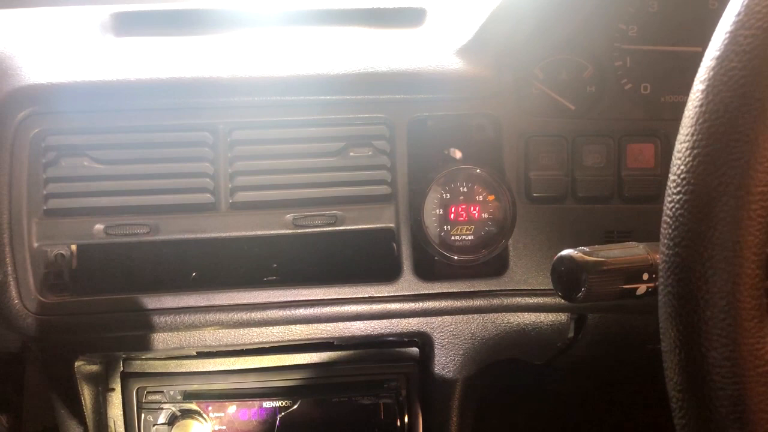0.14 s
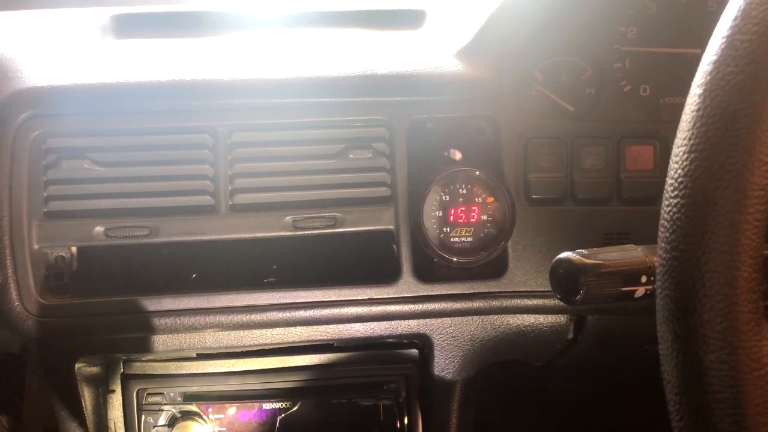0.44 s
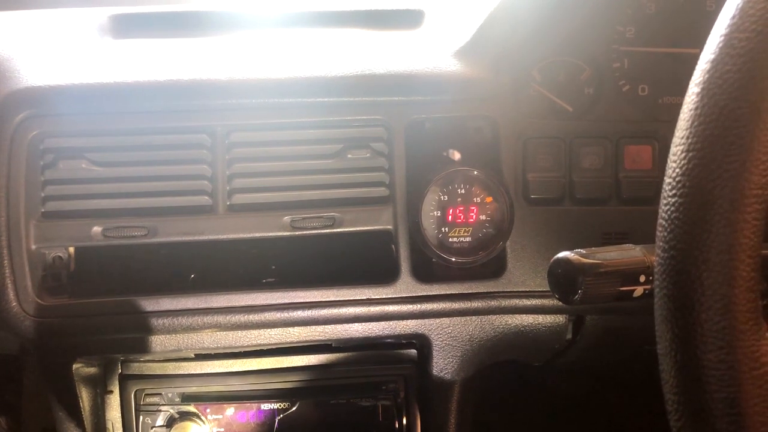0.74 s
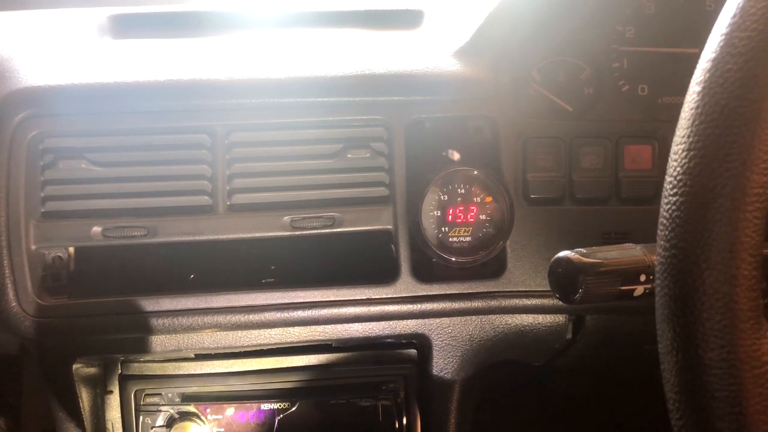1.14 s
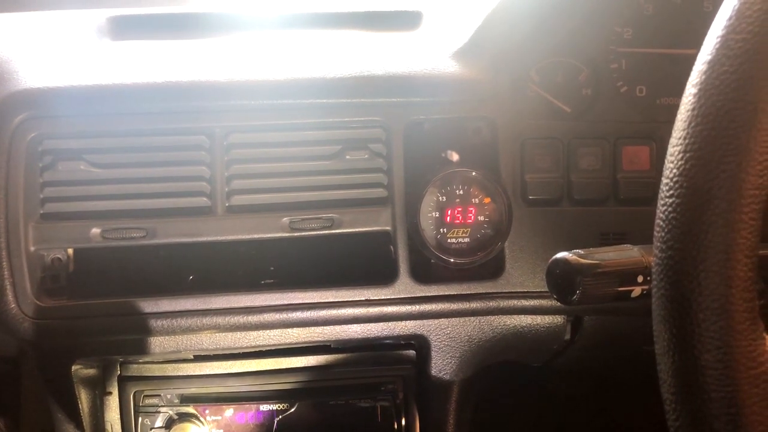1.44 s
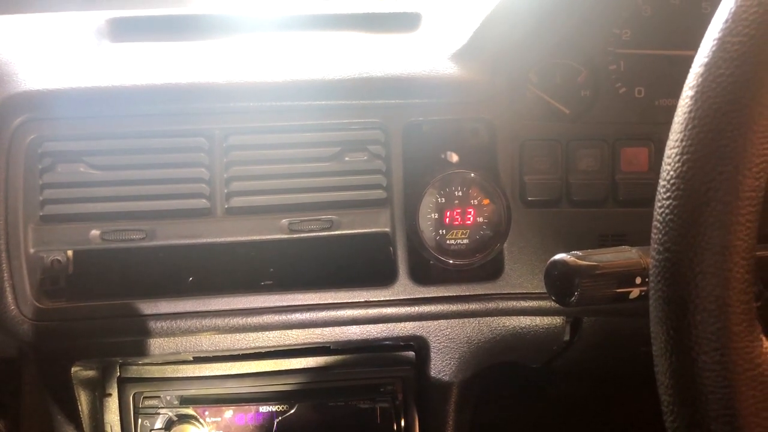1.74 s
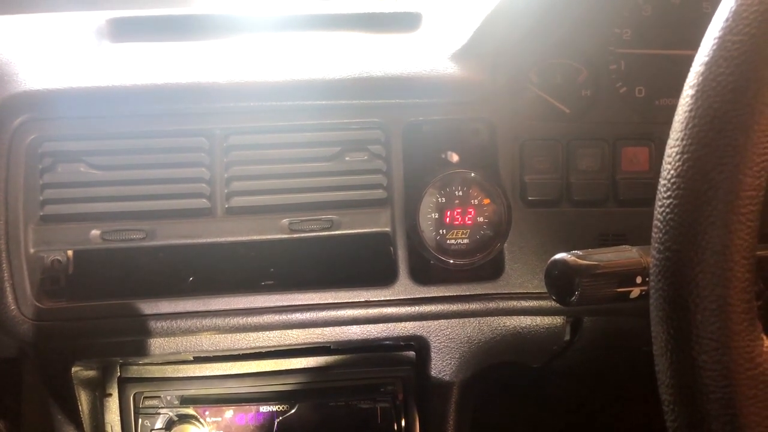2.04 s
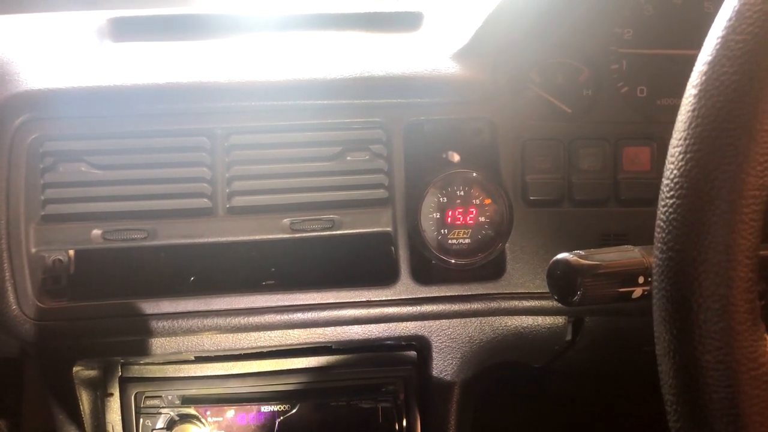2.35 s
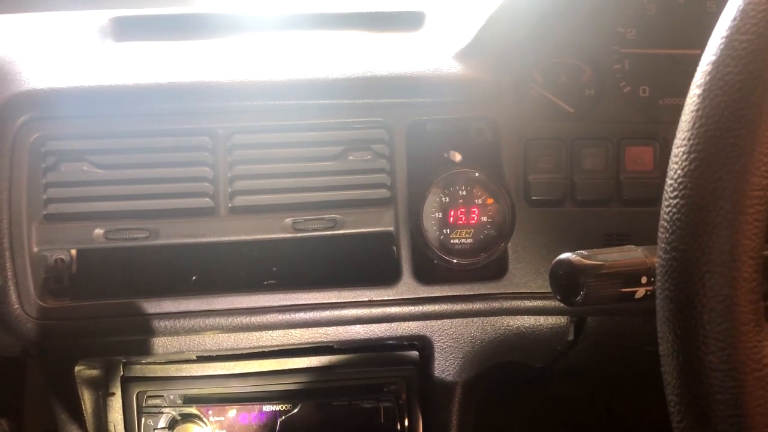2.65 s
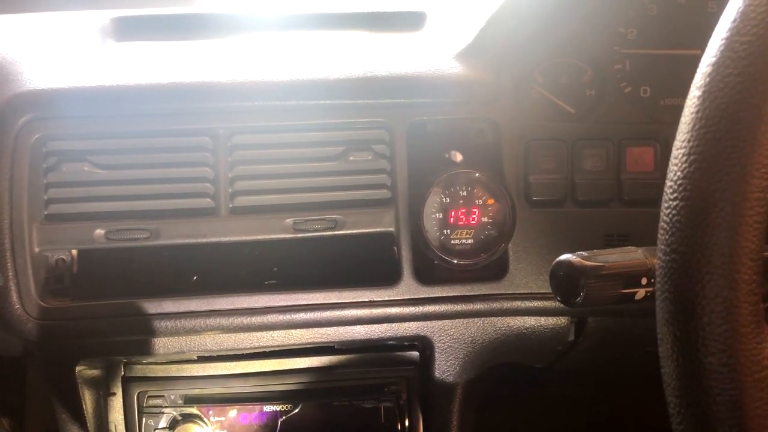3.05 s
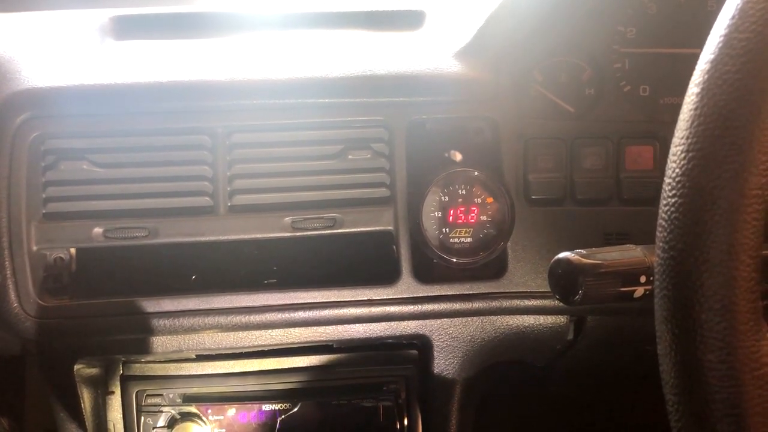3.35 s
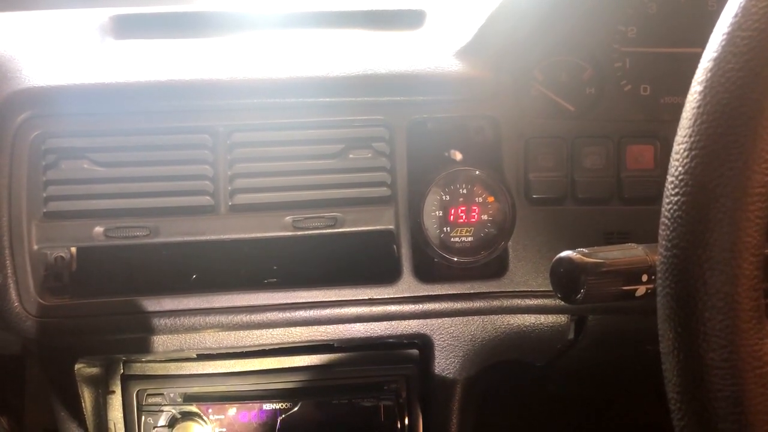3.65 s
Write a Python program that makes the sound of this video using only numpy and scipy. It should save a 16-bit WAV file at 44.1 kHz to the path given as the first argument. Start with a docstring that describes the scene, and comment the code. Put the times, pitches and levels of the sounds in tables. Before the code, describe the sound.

A car engine idles continuously inside a closed cabin, a deep throbbing hum with uneven low thuds, soft muffled mechanical hiss and faint whines; the speed sags very slightly. The microphone is near the dashboard.

```python
"""A four-cylinder engine idles fast, heard inside the cabin, its speed sagging slightly.
Even firings give a stack of low hums, sines locked to multiples of the firing rate.
Uneven firings thud between them: clicks and steady random shaking filtered by the cabin.
Shaped noise adds a soft mechanical wash; narrow noise adds faint panel resonances and accessory whines."""
import sys
import numpy as np
from scipy import signal
from scipy.io import wavfile
from scipy.ndimage import uniform_filter1d

SR = 44100
rng = np.random.default_rng(int(sys.argv[2]) if len(sys.argv) > 2 else 0)


def to_wav(sig):
    """Store sig (one row per channel, or 1-D mono) as 16-bit WAV at the path in sys.argv[1].

    Samples outside -1..1 are clipped; the rate is SR.
    """
    pcm = np.clip(np.atleast_2d(sig), -1, 1) * 32767
    pcm = np.round(pcm).astype(np.int16)
    wavfile.write(sys.argv[1], SR, pcm.T)  # frames by channels


N = 167580


def amp(db):
    """Linear gain of a level in dB."""
    return 10 ** (np.asarray(db) / 20)


def evened(x):
    """Scale a signal to an rms of 1."""
    return x / np.sqrt(np.mean(x ** 2) + 1e-20)


def read(points, hz):
    """Read a curve of (f/Hz, level/dB) points along log frequency."""
    f, value = np.transpose(points)
    return np.interp(np.log(hz + 1), np.log(f + 1), value)


def drift(rate_hz, count=24):
    """Slow random movement of rms 1: sines of random phase up to rate_hz."""
    t = np.arange(0, N + 64, 64) / SR
    slow = np.zeros(len(t))
    for f in np.linspace(rate_hz / count, rate_hz, count):
        slow += np.sin(2 * np.pi * (f * t + rng.random()))
    return np.interp(np.arange(N) / SR, t, evened(slow))


def controls():
    """Firing rate in Hz, running count of firings, and change of the boom in dB."""
    # engine speed: t/s, firing rate/Hz
    speed_points = [(0, 47.3), (.45, 47.1), (.85, 46.6), (1.3, 46.6), (1.7, 46.9), (2.05, 46.7),
                    (2.3, 46.3), (2.8, 45.9), (3.8, 45.9)]
    # second-order boom: t/s, level/dB
    boom_points = [(0.05, -13), (0.36, -12), (0.39, -16), (0.47, -14), (0.75, -16), (0.79, -11),
                   (0.99, -18), (1.04, -12), (1.19, -17), (1.3, -12), (1.35, -18), (1.4, -14), (1.95, -15),
                   (1.98, -12), (2.02, -19), (2.08, -15), (2.29, -17), (2.32, -23), (2.41, -15),
                   (2.53, -23), (2.69, -16), (2.78, -25), (2.86, -16), (2.96, -27), (3.13, -18),
                   (3.19, -33), (3.22, -21), (3.27, -16), (3.39, -26), (3.53, -17), (3.7, -24), (3.75, -19)]
    boom_mean_db = -15.5
    t = np.arange(N) / SR
    rate = np.interp(t, *np.transpose(speed_points))
    turns = .5 + np.cumsum(rate) / SR
    boom_db = np.interp(t, *np.transpose(boom_points)) - boom_mean_db
    return rate, turns, boom_db


def hums(rate, turns, boom_db):
    """Even firings: sines at locked multiples of the firing rate, with phases set by order and cabin."""
    # engine orders: multiple of the firing rate, rms level/dB, share of the boom's change, waver/dB
    orders = [(1, -18, -0.089, 0.1), (2, -15.5, 1.08, -0.5), (3, -17, -0.21, 0.27), (4, -27, 0.13, 0.7),
              (5, -25.5, .2, 1.4), (6, -35.5, 1.6, 1.93), (7, -46.5, -0.44, 1.5), (9, -51, -0.67, 2.0)]
    waver_hz = 12
    cabin_hz = 252  # hums above this cabin resonance fall a full turn behind
    # before the cabin's lag, odd multiples trail the firing; even multiples run ahead of the odd ones
    odd_lag_rad, even_lead_rad = .45, .8
    out = np.zeros(N)
    for k, db, share, waver_db in orders:
        cabin_lag = 4 * np.arctan((k * rate / cabin_hz) ** 8)
        lag = odd_lag_rad - even_lead_rad * (k % 2 == 0) + cabin_lag
        level_db = db + share * boom_db + waver_db * drift(waver_hz)
        out += amp(level_db) * np.cos(2 * np.pi * k * turns - lag)
    return np.sqrt(2) * out  # peak from rms


def thuds(turns):
    """Uneven firings: clicks of varying strength, mixed with noise and coloured by the cabin."""
    # steady strength offset of each of the four cylinders (relative)
    cylinder_offsets = [-0.2, 0.26, 0.68, -0.55]
    # colour of the thuds in the cabin: f/Hz, relative level/dB
    cabin_colour = [(20, -49), (36, -36), (47, -12), (58, 3.5), (72, -7.5), (85, -5.5), (105, -2.5),
                    (125, -3.5), (145, -4), (165, 3.5), (180, -3), (200, -8.5), (222, -17), (252, -7),
                    (270, -19.5), (300, -18), (330, -16), (360, -22), (600, -63), (1500, -93.5)]
    scatter = 1.22  # random strength of each firing, on the scale of the offsets
    rumble_share = 0.57  # share of steady random shaking
    thud_db = -24  # rms level
    firing = turns.astype(int)
    chance = rng.standard_normal(firing[-1] + 1)
    strength = np.array(cylinder_offsets)[firing % 4] + scatter * chance[firing]
    clicks = strength * (np.diff(firing, prepend=0) > 0)
    shaking = rng.standard_normal(N)
    drive = (1 - rumble_share) * evened(clicks) + rumble_share * shaking

    # minimum phase: the cabin answers each click at once, then rings out
    hz = abs(np.fft.fftfreq(16384, 1 / SR))
    log_gain = np.log(amp(read(cabin_colour, hz)))
    phase = -signal.hilbert(log_gain).imag
    cabin = np.fft.ifft(np.exp(log_gain + 1j * phase)).real[:8192]
    return amp(thud_db) * evened(signal.fftconvolve(drive, cabin)[:N])


def wash(turns):
    """Muffled engine-bay noise with faint patches, breathing slightly with the crank."""
    # colour of the wash: f/Hz, relative level/dB per Hz
    wash_colour = [(200, -31), (340, -3), (454, -5.5), (577, -4), (710, -6), (821, -5), (1060, -6),
                   (1510, -5), (2640, -13.5), (4560, -18.5), (7860, -26), (10200, -34.5), (12100, -33.5),
                   (15600, -39.5)]
    wash_db, swell_db, swell_hz = -33.5, 0.21, 5.5  # mean level, slow swell and its fastest rate
    panel_db, patch_db = 2.0, 0.43  # fixed ripple of many small panel modes; moving patches
    chuff = 0.029  # depth of the breathing
    low_cut_hz = 330
    frames, hz = N // 512 + 5, np.fft.rfftfreq(2048, 1 / SR)
    a, b, patches = rng.standard_normal((frames, 1025, 3)).T
    # smooth the patches over 16 frequency bins and 5 frames
    patches = uniform_filter1d(uniform_filter1d(patches, 16, 0), 5, 1)
    patches = evened(patches)
    panels = panel_db * rng.standard_normal(1025)
    colour_db = (read(wash_colour, hz) + panels)[:, None] + patch_db * patches
    spectrum = (a + 1j * b) * amp(colour_db) * (hz[:, None] > low_cut_hz)
    noise = evened(signal.istft(spectrum, nperseg=2048, noverlap=1536)[1][:N])
    breathing = 1 + chuff * np.cos(np.pi * turns)  # one cycle per two firings
    return amp(wash_db + swell_db * drift(swell_hz)) * noise * breathing


def rings(rate):
    """Panel resonances and whines: narrow noise shifted to pitches that follow engine speed."""
    # resonances and whines at the reference speed: f/Hz, width/Hz, rms level/dB
    ring_table = [(522.4, 14, -55.5), (591.5, 41, -48), (655, 18, -53.5), (824, 37, -47), (959, 14, -50),
                  (1153, 37, -49), (1218, 11, -54.5), (1506, 54, -44), (1717, 53, -66), (1800, 40, -47),
                  (1970, 16, -51), (2133, 34, -51), (2432, 60, -54.5), (3140, 33, -55), (4620, 40, -59.5),
                  (7420, 1400, -62.5), (8100, 200, -70), (12000, 500, -73)]
    reference_hz = 46.9  # firing rate at which the pitches are listed
    steady = .8  # steady tone within each narrow ring, against noise of deviation 1
    out = np.zeros(N)
    for hz, width, db in ring_table:
        pole = np.exp(-np.pi * width / SR)
        fuzz = rng.standard_normal(N) + 1j * rng.standard_normal(N)
        fuzz = signal.lfilter([1], np.convolve([1, -pole], [1, -pole]), fuzz)
        fuzz = fuzz / np.std(fuzz) + steady * (width < 100)
        carrier = np.exp(2j * np.pi * np.cumsum(hz * rate / reference_hz) / SR)
        out += amp(db) * evened((fuzz * carrier).real)
    return out


def scene():
    """Sum hums, thuds, wash and rings, all driven by one engine speed."""
    rate, turns, boom_db = controls()
    engine = hums(rate, turns, boom_db) + thuds(turns)
    return (engine + wash(turns) + rings(rate))[None]


def record(dry):
    """Band limit: a steep linear-phase low-pass takes off the top treble."""
    edge_hz = 15750
    lowpass = signal.firwin(1023, edge_hz, window=("kaiser", 9), fs=SR)
    return signal.oaconvolve(dry, lowpass[None], "same")


dry = scene()
out = record(dry)
to_wav(out)
```